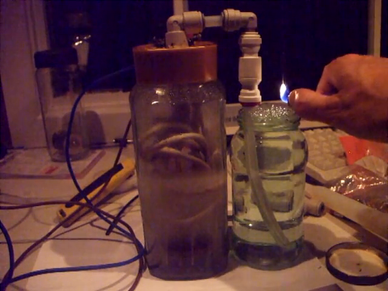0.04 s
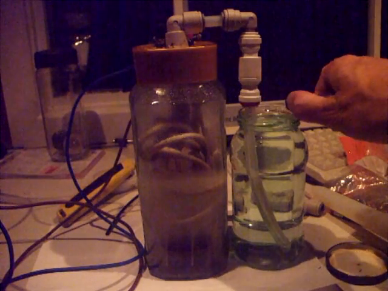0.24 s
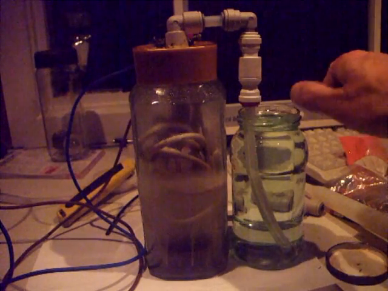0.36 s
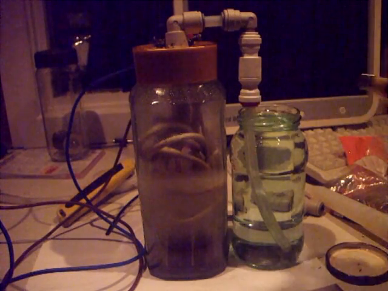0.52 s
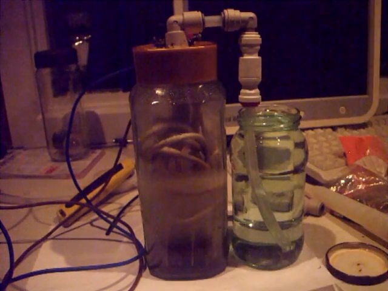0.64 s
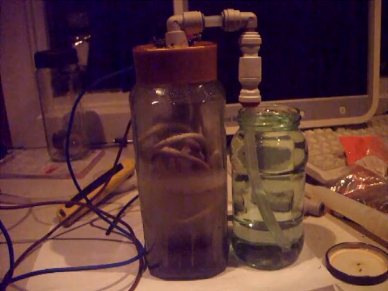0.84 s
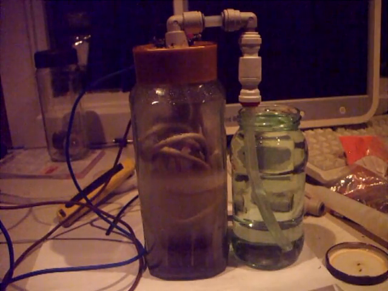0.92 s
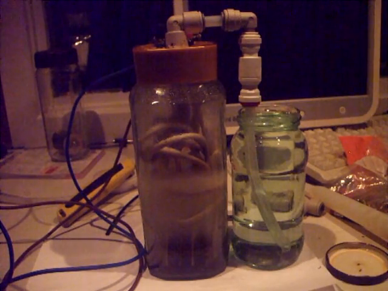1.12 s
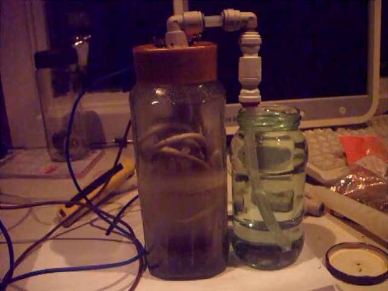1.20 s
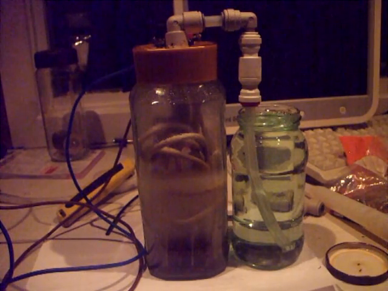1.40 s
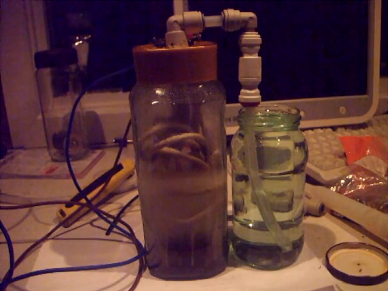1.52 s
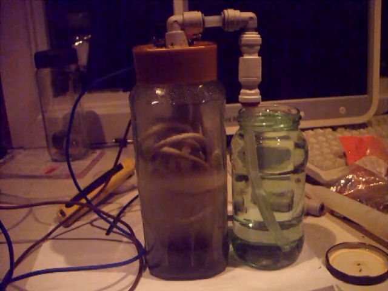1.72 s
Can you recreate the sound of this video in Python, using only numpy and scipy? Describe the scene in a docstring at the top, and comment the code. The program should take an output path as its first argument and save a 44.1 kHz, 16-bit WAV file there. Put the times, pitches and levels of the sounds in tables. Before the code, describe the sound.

A sharp, overloaded bang from gas foam exploding at a jar's mouth comes almost at once, its short boxy room ring fading into faint hiss, soft regular bubbling and a few dry handling ticks.

```python
"""A steady hiss and soft bubbling, one sharp bang in a small room, then bubbling again with a few dry ticks.
Gas bubbles out of a tube into a jar of soapy water (short sine notes), and a lighter sets off the foam
(a noise crack plus ringing sines). The room answers with fading noise bands and standing waves.
The bang overloads a small camera, whose gain control holds the room's ring level before it dies away.
The camera's coarse steps, about 8 bits, turn the quiet into the hiss."""
import sys
import numpy as np
from scipy import signal
from scipy.io import wavfile

SR = 44100
rng = np.random.default_rng(int(sys.argv[2]) if len(sys.argv) > 2 else 0)


def file_out(sig):
    """Save sig as 16-bit WAV at sys.argv[1]."""
    # one column per channel
    cols = np.atleast_2d(sig).T
    # limit, then scale
    lim = np.clip(cols, -1, 1)
    pcm = np.round(lim * 32767).astype(np.int16)
    wavfile.write(sys.argv[1], SR, pcm)


N = 77175   # length in samples, 1.75 s
BANG_S = 0.242
PASS_HZ = 5450   # upper edge of the converter; the fine hiss softens above it too


def from_db(db):
    """Turn decibels into a gain."""
    return 10 ** (np.asarray(db) / 20)


def rms_one(x):
    """Scale a sound to an rms (average strength) of 1."""
    return x / np.sqrt(np.mean(x ** 2) + 1e-20)


def since(s):
    """Seconds since a moment, zero before it."""
    return np.maximum(np.arange(N) / SR - s, 0)


def fade_db(s, t60):
    """Steady fade from 0 dB at s: 60 dB in every t60 seconds, down to -300 dB."""
    return -60 * np.minimum(since(s) / t60, 5)


def decay(s, t60):
    """Envelope that jumps to 1 at s and dies away."""
    return (since(s) > 0) * from_db(fade_db(s, t60))


def smooth(x, seconds):
    """Even out quick changes with a one-pole low-pass."""
    r = np.exp(-1 / (seconds * SR))
    return signal.lfilter([1 - r], [1, -r], x)


def ring(modes, s):
    """Decaying sines struck together, their signs alternating."""
    out = np.zeros(N)
    for k, (hz, db, t60) in enumerate(modes):
        wave = np.sin(2 * np.pi * hz * since(s))
        out += (-1) ** k * from_db(db) * decay(s, t60) * wave
    return out


def at_hz(table, hz, axis=1):
    """Read a table column at a frequency, on a log-frequency scale."""
    table = np.array(table)
    return np.interp(np.log(hz), np.log(table[:, 0]), table[:, axis])


def noise_bands(table):
    """Third-octave bands of noise coloured by a table, rms 1 in total: (centres, bands)."""
    edges = 24 * 2 ** (np.arange(25) / 3)
    centres = np.sqrt(edges[:-1] * edges[1:])
    white = rng.standard_normal((2, N))   # neighbouring bands use different noise
    bands = []
    for k, hz in enumerate(centres):
        band_pass = signal.butter(2, edges[k:k + 2], "band", fs=SR, output="sos")
        bands.append(from_db(at_hz(table, hz)) * signal.sosfilt(band_pass, white[k % 2]))
    bands = np.array(bands)
    return centres, bands / bands.sum(axis=0).std()


def background():
    """Quiet room tone, a steady coloured noise, with one brief low flutter."""
    # colour of the room tone: [f/Hz, relative level/dB per Hz]
    tone_colour = [(30, 5.5), (70, -0.5), (160, -4), (300, -1.5), (600, -4.5), (900, -9), (1130, -2),
                   (1400, -13.5), (3000, -13), (5000, -14.5)]
    tone_db = -51
    flutter_s, flutter_width_s, flutter_hz, flutter_db = 1.07, 0.07, 38, -46
    tone = from_db(tone_db) * noise_bands(tone_colour)[1].sum(axis=0)
    t = np.arange(N) / SR - flutter_s
    swell = np.exp(-(t / flutter_width_s) ** 2)
    flutter = from_db(flutter_db) * swell * np.sin(2 * np.pi * flutter_hz * t)
    return tone + flutter


def converter(x):
    """Low-rate sampling, rounded down to coarse steps: the rounding errors are the hiss."""
    step_db, decimation = -42.5, 4   # keeps one sample in four
    step = from_db(step_db)
    guard = signal.firwin(161, PASS_HZ, window="blackman", fs=SR)
    slow = signal.resample_poly(x, 1, decimation, window=guard)
    coarse = step * np.floor(slow / step)
    return signal.resample_poly(coarse, decimation, 1, window=guard)[:N]


def bubbles():
    """Each bubble swells, breaks from the tube and rings on, always at the same pitch."""
    # bubbles leaving the tube: [t/s, peak level/dB]
    bubble_list = [(.034, -44.5), (.186, -43), (.644, -46), (.797, -46.5), (.954, -47), (1.105, -46.5),
                   (1.254, -43.5), (1.404, -43.5), (1.554, -42), (1.708, -40)]
    pitch_hz, swell_s, t60_s = 620.5, 0.008, 0.065
    out = np.zeros(N)
    for s, db in bubble_list:
        age = since(s - swell_s)
        swell = np.minimum(age / swell_s, 1)   # full at s, when the fade starts
        level = from_db(db + fade_db(s, t60_s))
        out += level * swell * np.sin(2 * np.pi * pitch_hz * age)
    return out


def bang():
    """The foam explodes: a noisy crack and a short ring of the jar's mouth."""
    # the burst of gas and the jar's mouth: [f/Hz, level/dB, t60/s]
    jar_modes = [(226, 9, 0.01), (1574, 29.5, .005), (641.7, 23.5, 0.021), (1913.3, 27, 0.0062),
                 (965.3, 14, 0.024), (4522, 0.5, 0.012)]
    crack_db, crack_t60_s = -4, 0.04
    crack = from_db(crack_db) * decay(BANG_S, crack_t60_s) * rng.standard_normal(N)
    return crack + ring(jar_modes, BANG_S)


def microphone_push():
    """The microphone's slow swing back after the blast: one low, fast-fading sine."""
    push_hz, push_db, push_t60_s = 26, -5.5, 0.043
    return -ring([(push_hz, push_db, push_t60_s)], BANG_S)


def room_ring():
    """Reflections arrive, build up and die, treble first, leaving the standing waves."""
    # the room's diffuse answer: [f/Hz, relative level/dB per Hz, t60/s]
    room_bands = [(60, -17, 0.57), (122, -13, .38), (202.3, -1, 0.4), (360, 1.5, .33), (700, 4.5, 0.28),
                  (1280, -3, 0.23), (2240, -10, 0.21), (3680, -14, 0.2), (4900, -9, 0.1)]
    # the room's standing waves: [f/Hz, level/dB, t60/s]
    standing_waves = [(159.9, -36.5, 1.2), (175, -6.5, .35), (192.2, -4, .37), (247.2, -6, 0.23),
                      (313.8, 1.5, 0.33), (354.5, 4.5, .3), (377.3, -2.5, .35), (421.7, -8, 0.29),
                      (525, -45, 2.2), (605, -8, .33), (792, -7, .33), (885, -7, 0.29)]
    diffuse_db, build_s, delay_s = 7, 0.002, 0.004
    s = BANG_S + delay_s
    diffuse = np.zeros(N)
    for hz, band in zip(*noise_bands(room_bands)):
        diffuse += band * decay(s, at_hz(room_bands, hz, axis=2))
    build_up = 1 - np.exp(-since(s) / build_s)
    return build_up * (from_db(diffuse_db) * diffuse + ring(standing_waves, s))


def gain_control(x):
    """Turns loud sound down towards the hold level, too late for the first milliseconds."""
    hold_db, squeeze = -15.5, 0.92   # squeeze: share of the excess dB taken away
    sense_s, attack_s, reaction_s, release_db_per_s = 0.017, 0.0023, 0.0026, 400
    t = np.arange(N) / SR
    level_db = 10 * np.log10(smooth(x ** 2, sense_s) + 1e-12)
    over_db = np.maximum(level_db - hold_db, 0)
    # keep the highest excess so far, letting it fall at the release rate
    held_db = np.maximum.accumulate(over_db + release_db_per_s * t) - release_db_per_s * t
    late_db = np.interp(t - reaction_s, t, smooth(held_db, attack_s))
    return x * from_db(-squeeze * late_db)


def knocks():
    """Short dry ticks from handling the camera: dulled noise that dies away fast."""
    # handling knocks: [t/s, starting rms level/dB]
    knock_list = [(0.6432, -45.5), (0.958, -55), (1.732, -37.5), (1.740, -45)]
    t60_s, dull_hz, top_hz = 0.029, 900, 10100   # gentle and steep treble cuts
    grain = smooth(rng.standard_normal(N), 1 / (2 * np.pi * dull_hz))
    grain = rms_one(signal.sosfilt(signal.butter(4, top_hz, fs=SR, output="sos"), grain))
    return grain * sum(from_db(db) * decay(s, t60_s) for s, db in knock_list)


def scene():
    """Add up the sounds in the room, the same on both channels."""
    return np.tile(background() + bubbles() + bang() + room_ring(), (2, 1))


def record(dry):
    """Gain control, swing back, overload, coarse converter, ticks, fine hiss and top cut."""
    drive_db, fine_hiss_db, cutoff_hz = 0.45, -68.5, 15500   # hiss level is before its softening
    x = gain_control(dry.mean(axis=0)) + microphone_push()
    x = converter(np.clip(x, -1, 1))
    x = np.clip(from_db(drive_db) * x, -1, 1)   # the last overload
    soften = signal.butter(1, PASS_HZ, fs=SR, output="sos")
    fine_hiss = from_db(fine_hiss_db) * signal.sosfilt(soften, rng.standard_normal(N))
    x = x + knocks() + fine_hiss
    top_cut = signal.firwin(101, cutoff_hz, fs=SR)
    return np.tile(signal.fftconvolve(x, top_cut, "same"), (2, 1))


dry = scene()
out = record(dry)
file_out(out)
```